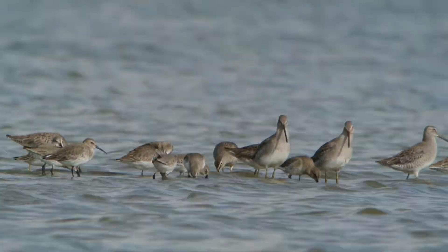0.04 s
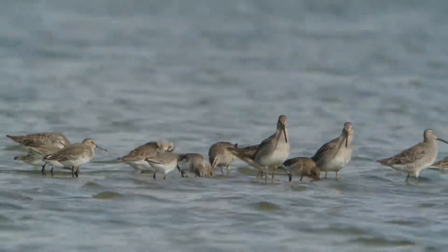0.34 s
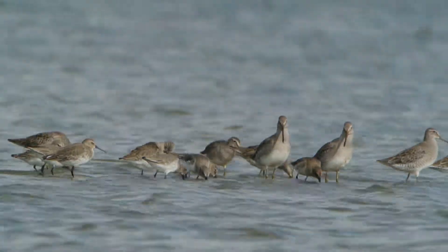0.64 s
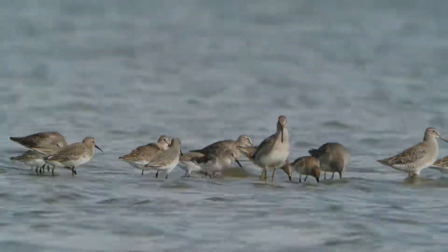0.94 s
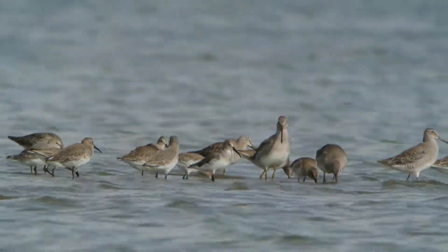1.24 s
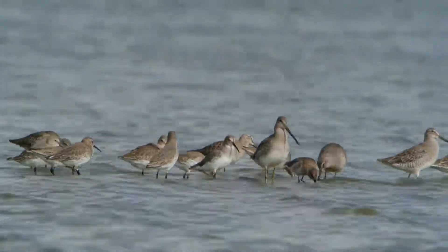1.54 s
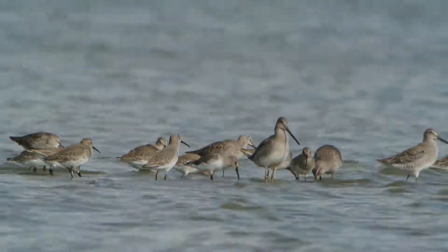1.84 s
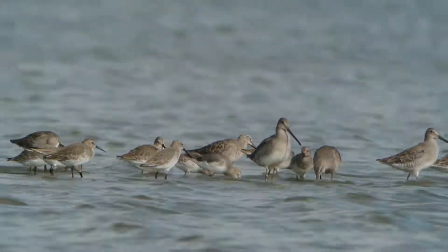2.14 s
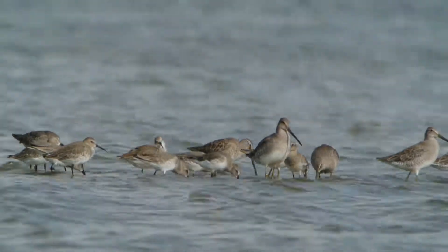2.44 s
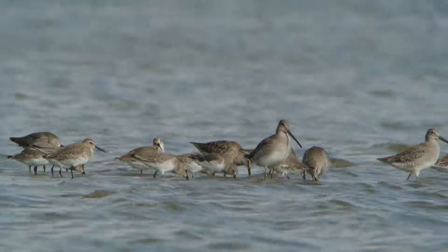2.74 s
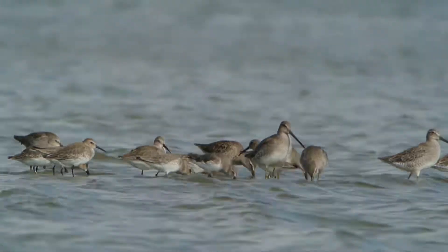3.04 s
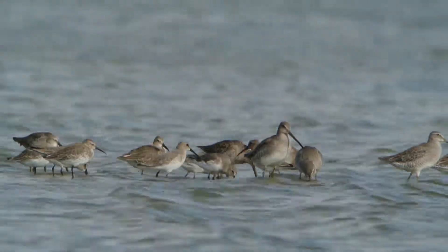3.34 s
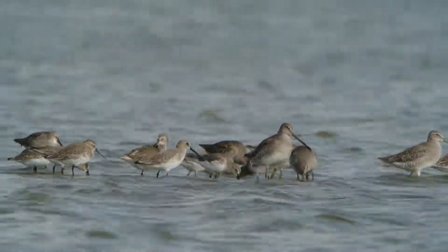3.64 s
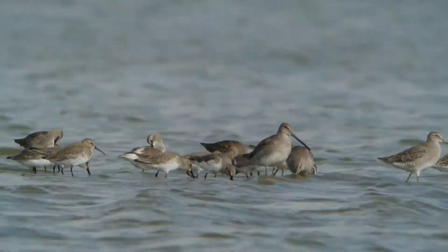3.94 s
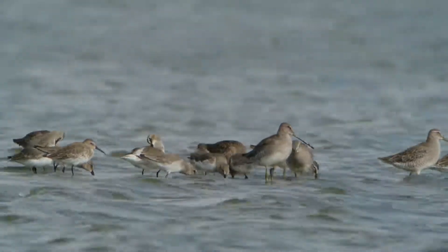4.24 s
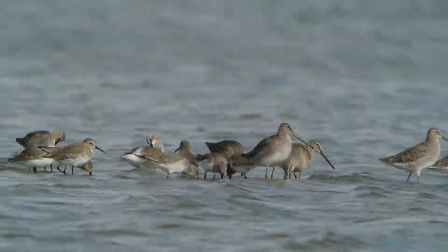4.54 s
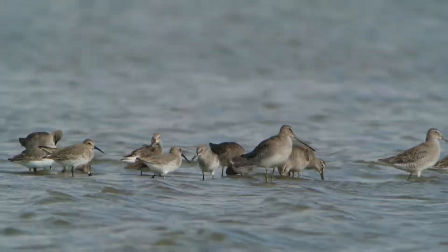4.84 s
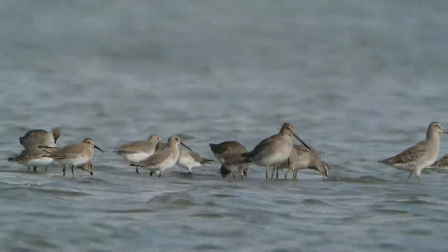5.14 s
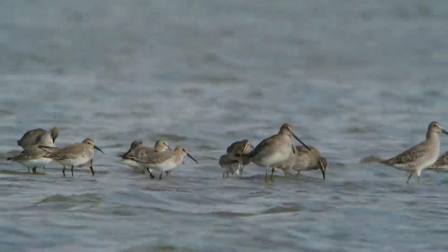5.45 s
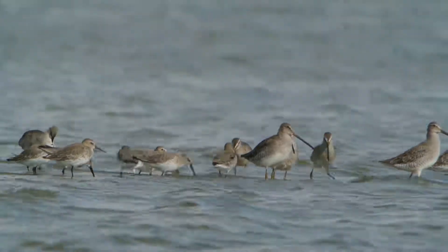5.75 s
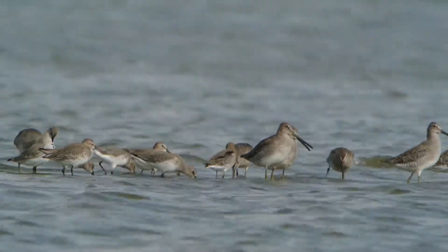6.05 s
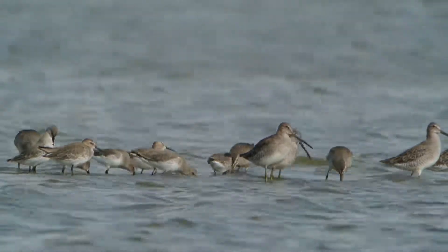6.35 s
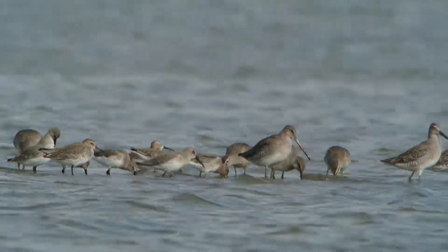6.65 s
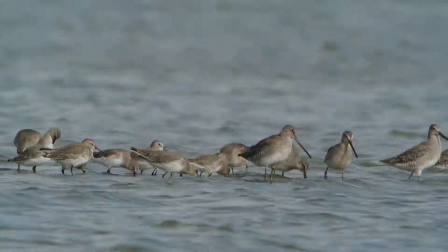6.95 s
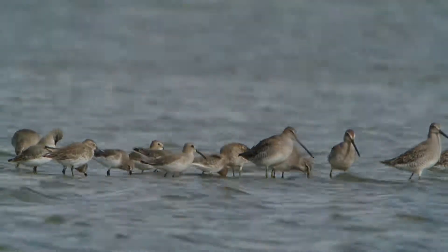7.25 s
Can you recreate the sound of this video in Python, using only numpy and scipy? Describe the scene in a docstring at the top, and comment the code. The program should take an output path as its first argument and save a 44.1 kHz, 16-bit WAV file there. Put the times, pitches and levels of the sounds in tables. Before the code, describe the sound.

Sharp camera shutter clicks fire in pairs and singles over low wind rumble and bumps on the microphone beside water.

```python
"""Beside a windy lagoon, one shot of a reflex camera dies away: like each frame, a run of mirror and
shutter contacts over the whirr of the cocking motor. Wind rumbles on both microphone ports, over far
water and a faint hiss. As it rises, eddies thump on the exposed right port, hardest from 0.5 to 2.1 s.
The camera fires a pair from 1.2 s, a single at 2.6 s, a pair from 4.3 s and a last single at 6.4 s,
and the wind blows on to the end."""
import sys
import numpy as np
from scipy import signal
from scipy.fft import rfft, irfft
from scipy.io import wavfile

SR = 44100
rng = np.random.default_rng(int(sys.argv[2]) if len(sys.argv) > 2 else 0)


def store_wav(level_fs):
    """Save 16-bit WAV to argv[1]."""
    pcm = np.round(np.clip(np.atleast_2d(level_fs), -1, 1) * 32767)
    wavfile.write(sys.argv[1], SR, pcm.T.astype(np.int16))


N = 326340
TIME_S = np.arange(N) / SR
FREQS_HZ = np.maximum(np.fft.rfftfreq(N, 1 / SR), 1)


def from_db(db):
    return 10 ** (np.asarray(db) / 20)


def unit_rms(x):
    return x / np.sqrt(np.mean(x ** 2, axis=-1, keepdims=True) + 1e-20)


def over_time(points):
    return np.interp(TIME_S, *np.transpose(points))


def over_freq(points):
    hz, db = np.transpose(points)
    return np.interp(np.log(FREQS_HZ), np.log(hz), db)


def colour(x, curve_db):
    """Filter that keeps the power of white noise."""
    return irfft(rfft(x) * unit_rms(from_db(curve_db)), N)


def noise_pair(coherence, size=N):
    """White noise at the two ports, partly shared."""
    shared = np.sqrt(coherence) * rng.standard_normal(size)
    return shared + np.sqrt(1 - coherence) * rng.standard_normal((2, size))


def drift(rate_hz):
    """Slow random wander, unit RMS."""
    return unit_rms(irfft(rfft(rng.standard_normal(N)) / (1 + (FREQS_HZ / rate_hz) ** 2), N))


def add(out, start_s, sound):
    """Mix in a sound, dropping any overhang."""
    i = int(start_s * SR)
    first, last = max(i, 0), min(i + sound.shape[-1], out.shape[-1])
    if first < last:
        out[..., first:last] += sound[..., first - i:last - i]


def resonance(x, hz, width_hz):
    """One ringing mode, unity peak gain."""
    return signal.lfilter(*signal.iirpeak(hz, hz / width_hz, fs=SR), x + 1e-18)


def contact_noise(body_db, size, crossover_hz=2600):
    """Dense camera modes: the low body tone reaches both ports alike, the bright crack less so."""
    low, high = (signal.butter(2, crossover_hz, kind, fs=SR, output="sos") for kind in ("low", "high"))
    body = signal.sosfilt(low, noise_pair(coherence=0.9, size=size))
    crack = signal.sosfilt(high, noise_pair(coherence=0.42, size=size))
    return from_db(body_db) * body + crack


# Shots: landing_s, gain_db, landing_gain_db, upper_stop_gain_db, landing_t60_ratio
FRAMES = [(-.0070, -37, 16, 0, 1.05), (1.1521, -26.5, 4, 3, 0.83), (1.35, -26.5, 1, 2.5, 1.2),
          (2.6058, -26, 0.5, 1.5, 0.95), (4.2806, -24.5, -2.5, .5, 1.26), (4.4781, -26, 2, 1.5, 1.1),
          (6.3990, -25, -1, 0, 1.05)]
# Contacts: gain_db, t60_s, body_db, rise_s Rows: an early latch tick, release latch, latch return, aperture
# lever, mirror meets upper stop, hits it as the first curtain opens, second curtain, mirror catch, mirror
# lands, rebounds, settles.
CONTACTS = [(-30, .02, -5, .0005), (-11, 0.015, 10.5, .0003), (-20.5, .022, 14, .0005),
            (-13.5, 0.018, -8, .0008), (-13.5, 0.01, 15.5, 0.00036), (-5.5, 0.021, 9.5, 0.00087),
            (-12, 0.028, 6, .0003), (-14, 0.06, 10, 0.0011), (5.5, .013, -5, 0.00018),
            (-4, 0.023, 4, 0.00034), (-15, 0.028, -11, .0004)]
# Each contact's time before the mirror lands: lead_s
CONTACT_LEADS_S = (.1290, .1169, .1108, .0736, .0554, .0540, .0303, .0080, 0, -.0040, -.0130)
# Contact spectrum: freq_hz, gain_db
CLACK_SPECTRUM = [(300, -9), (800, -6), (1200, -2), (2200, -4.5), (3500, -8), (5000, -2.5), (5700, -4),
                  (6400, -1.5), (7700, -1.5), (9000, -2), (10500, -8.5), (11300, -6.5), (13000, 1),
                  (15500, -4), (17000, -27)]


def shutter(gain_db=5.5, tail_db=-31, tail_t60_s=0.21, shared_power=0.086, upper_stop_lead_s=0.054):
    """Each contact rings the camera in a short noise, partly alike per frame; the landing mirror pings."""
    frames = np.zeros((len(FRAMES), 2, SR // 3))
    t, preroll_s = np.arange(SR // 10) / SR, 0.15
    for lead_s, (contact_db, t60_s, body_db, rise_s) in zip(CONTACT_LEADS_S, CONTACTS):
        shared = np.sqrt(shared_power) * contact_noise(body_db, len(t))
        attack = 1 - np.exp(-t / rise_s)
        tail = from_db(tail_db - 60 * t / tail_t60_s)
        for frame, (_, frame_db, landing_db, stop_db, t60_ratio) in zip(frames, FRAMES):
            own = np.sqrt(1 - shared_power) * contact_noise(body_db, len(t))
            ring_s = t60_s * (t60_ratio if lead_s == 0 else 1)
            envelope = attack * np.hypot(from_db(-60 * t / ring_s), tail)
            click = from_db(gain_db + frame_db + contact_db) * envelope * (shared + own)
            if lead_s == upper_stop_lead_s:
                click *= from_db(stop_db)
            if lead_s == 0:
                mirror_ping = resonance(click, hz=11820, width_hz=550)
                click = from_db(landing_db) * (click + mirror_ping)
            add(frame, preroll_s - lead_s, click)
    out = np.zeros((2, N))
    for (landing_s, *_), frame in zip(FRAMES, frames):
        add(out, landing_s - preroll_s, shell(frame))
    return irfft(rfft(out) * from_db(over_freq(CLACK_SPECTRUM)), N)


# Shell resonances: freq_hz, width_hz, gain_db
SHELL_MODES = [(2084, 80, 2.5), (2630, 91, 6), (3240, 160, 7), (3770, 180, 7.5), (4410, 320, 8),
               (5000, 350, 2.5), (6960, 160, 5.5), (9150, 610, 7.5), (11600, 420, 10), (13150, 700, 0.5),
               (14500, 700, 2.5)]


def shell(clicks, detune=0.006, spread_db=0.5):
    """The shell rings on after the contacts, varying a little per frame and port."""
    out = clicks.copy()
    scatter = np.clip(rng.standard_normal((len(SHELL_MODES), 2, 2)), -1.5, 1.5)
    for (hz, width_hz, gain_db), ports in zip(SHELL_MODES, scatter):
        for port, (dip, shift) in enumerate(ports):
            ring = resonance(clicks[port], hz * (1 + detune * shift), width_hz)
            out[port] += (from_db(gain_db - spread_db * dip) - 1) * ring
    return out


def motor_effort(t, lead_s=0.16, spin_up_s=0.039, tension_lead_s=0.031, tension_end_s=0.0074,
                 tension_db=5, coast_db=2, coast_t60_s=0.15):
    """Spin-up, steady run, push on the mirror spring, coast; the mirror lands at t = 0."""
    spin = np.clip((t + lead_s) / spin_up_s, 0, 1)
    driven_db = tension_db * (t > -tension_lead_s)
    coasting_db = coast_db - 60 * np.maximum(t - tension_end_s, 0) / coast_t60_s
    return spin * from_db(np.where(t < tension_end_s, driven_db, coasting_db))


# Gear whirr: freq_hz, density_db
WHIRR_SPECTRUM = [(400, -40), (1000, 3), (2000, 6.5), (2700, 6.5), (3400, 7), (4150, 11), (4800, 0),
                  (5900, -3), (7500, -1), (8400, -5.5), (9300, 3.5), (10500, 0), (11700, -2), (13700, -3),
                  (15000, -2), (16000, -6)]


def motor(gain_db=-52, ticks_per_s=660, teeth_db=-2, spread_db=7.5):
    """The cocking gears whirr and their teeth rattle through each frame."""
    effort, t = np.zeros(N), np.arange(-SR // 2, SR // 2) / SR
    for landing_s, *_ in FRAMES:
        add(effort, landing_s + t[0], motor_effort(t))
    ticks = (rng.random(N) < ticks_per_s / SR) * rng.choice([-1, 1], N)
    teeth = ticks * from_db(spread_db * rng.uniform(-1, 1, N))
    gears = noise_pair(coherence=0.5) + from_db(teeth_db) * unit_rms(teeth)
    return colour(from_db(gain_db) * effort * gears, over_freq(WHIRR_SPECTRUM))


# Port turbulence: freq_hz, density_db
RUMBLE_SPECTRUM = [(15, -30), (30, -7), (50, -3), (85, 0.5), (150, 0.5), (300, -5), (450, -10), (700, -23),
                   (1100, -31.5), (2500, -50), (6000, -58.5)]


def rumble(level_db, lumps_db, tilt_db_per_oct):
    """Lumpy turbulence at one port."""
    air = rng.standard_normal(N) * from_db(lumps_db * drift(rate_hz=9.7))
    spectrum_db = over_freq(RUMBLE_SPECTRUM) + tilt_db_per_oct * np.log2(FREQS_HZ)
    return from_db(level_db) * unit_rms(colour(air, spectrum_db))


def eddy(t, hz, phase_turns, smoothness):
    """Pressure swing of a passing vortex: quicker if small, duller if smooth."""
    passage, steepness = 2 * np.pi * hz * t / smoothness, smoothness + 1
    swing = np.cos(2 * np.pi * phase_turns + steepness * np.arctan(passage))
    return swing * (1 + passage ** 2) ** (-steepness / 2)


def flutter(strength, centre_hz, spread_db, smoothness, count):
    """Small eddies of mixed size cross a port."""
    out, t = np.zeros(N), np.arange(-300, 300) / SR
    timing = rng.random((count, 2))
    scatter = np.clip(rng.standard_normal((count, 2)), -2, 2)
    for (when, phase_turns), (force, pitch) in zip(timing, scatter):
        pulse = eddy(t, centre_hz * np.exp(0.25 * pitch), phase_turns, smoothness)
        add(out, when * N / SR, from_db(spread_db * force) * pulse)
    return strength * unit_rms(out)


# Wind strength, left port: time_s, level_db
WIND_LEFT = [(0.0, -66), (.3, -61), (0.55, -47.5), (.8, -56), (.92, -58), (1.3, -56), (1.55, -45.5),
             (2.25, -43.5), (2.7, -44.5), (2.85, -41.5), (3.4, -35.5), (3.7, -42), (4.0, -40), (4.9, -44.5),
             (5.4, -43), (5.9, -45), (6.3, -40), (6.85, -40), (7.05, -37), (7.4, -46)]
# Wind strength, right port: time_s, level_db
WIND_RIGHT = [(0.0, -51), (0.2, -68), (.35, -61), (0.45, -43.5), (.7, -55), (.8, -49), (1.05, -49),
              (1.25, -43.5), (1.63, -43), (1.85, -36.5), (2.35, -34), (2.5, -36.5), (2.9, -36),
              (3.05, -40.5), (3.3, -39), (3.8, -41), (4.7, -42), (4.85, -45), (5.1, -37.5), (5.4, -40),
              (6.0, -36.5), (6.4, -33), (6.6, -31.5), (6.72, -40), (7.4, -36.5)]


def wind(left_gain_db=2.5, right_gain_db=1.5, left_flutter_db=-6, right_flutter_db=-10.5):
    """Both ports rumble; the sheltered left gets fewer, duller eddies, the exposed right the buffets."""
    left_db, right_db = over_time(WIND_LEFT), over_time(WIND_RIGHT)
    left = rumble(left_db + left_gain_db, lumps_db=1.5, tilt_db_per_oct=-0.76)
    left_eddies = from_db(left_db + left_flutter_db)
    left += flutter(left_eddies, centre_hz=220, spread_db=7, smoothness=2.8, count=500)
    right = rumble(right_db + right_gain_db, lumps_db=3.5, tilt_db_per_oct=2)
    side_wind_db = 0.42 * np.clip(right_db - left_db, 0, 6)
    right_eddies = from_db(right_db + right_flutter_db + side_wind_db) + stirred_air()
    right += flutter(right_eddies, centre_hz=430, spread_db=8, smoothness=3.75, count=2200)
    return np.array([left, right + buffets()])


# Far wind and water: freq_hz, density_db
SHORE_SPECTRUM = [(20, -7), (90, 8), (170, 3), (220, 3.5), (320, -3), (390, 0), (520, -6.5), (1000, -14),
                  (1250, -11.5), (1650, -13), (2500, -21), (6000, -53), (16000, -52)]


def shore(level_db=-52.5):
    """Steady low wash of far wind and water."""
    return from_db(level_db) * colour(noise_pair(coherence=0.79), over_freq(SHORE_SPECTRUM))


# Hiss colour: freq_hz, density_db
HISS_SPECTRUM = [(100, -6), (1600, 5.5), (2700, 5), (4300, 4.5), (5300, 1.5), (8000, 1.3), (9400, 4.5),
                 (10200, 2), (11200, 3), (12500, 4), (14200, 6), (15650, 1.5), (15950, -4)]
# Hiss swell: time_s, level_db
HISS_LEVEL = [(0, -56), (.25, -54.5), (.42, -55), (.7, -55), (1.7, -54), (1.95, -53), (2.2, -54),
              (2.7, -52.5), (2.95, -53), (3.2, -53), (3.32, -54), (4.2, -54), (4.8, -55), (5.27, -54.5),
              (5.42, -54), (5.72, -55.5), (6.0, -54), (6.7, -54), (7.1, -54.5), (7.4, -58.5)]


def hiss(waver_db=1.0):
    """A soft, wide hiss swells, sinks and wavers."""
    level_db = over_time(HISS_LEVEL) + waver_db * drift(rate_hz=12)
    return from_db(level_db) * colour(noise_pair(coherence=0.01), over_freq(HISS_SPECTRUM))


# Right-port buffets: middle_s, length_s, level_db, nominal_hz, smoothness, crackle_db
BUFFETS = [(0.081, 0.018, -36, 230, 6.1, -19), (.094, 0.0033, -30.5, 455, 3, -9),
           (0.415, 0.008, -38.5, 376, 4.1, -16), (0.5463, 0.0045, -19, 520, 2.5, -10),
           (0.5568, 0.01, -21, 625, 3.6, -6), (.5629, 0.0027, -17.5, 570, 2.6, -8),
           (0.592, 0.006, -29, 230, 3.7, -13), (0.6051, .0028, -17, 584, 2, -16),
           (0.6104, .003, -18.5, 580, 1.8, -19), (.6165, 0.0069, -20.5, 496, 2.8, -6),
           (.668, .0057, -36.5, 230, 4.3, -13), (.695, 0.008, -41, 445, 4.1, -9),
           (0.8255, 0.0064, -11, 500, 6, -8), (0.8307, 0.003, -8, 660, 5, -12),
           (.8362, 0.0083, -18.5, 710, 3.5, -6), (1.185, 0.027, -35.5, 186, 1.6, -13),
           (1.366, 0.014, -24, 498, 2.7, -9), (1.3913, 0.0068, -11.5, 492, 3.8, -6),
           (1.3977, 0.0039, -11, 536, 3.2, -8), (1.4831, 0.0046, -18.5, 403, 2.2, -5),
           (1.4885, 0.012, -15, 568, 2.4, -10), (1.5955, 0.0071, -13, 604, 4.3, -8.5),
           (1.68, 0.0018, -23, 575, 2.8, -13), (1.703, 0.021, -34.5, 254, 1.1, -13),
           (1.8873, 0.0051, -21, 710, 2.2, -9), (2.047, 0.0087, -30.5, 450, 1.6, -6),
           (2.0992, 0.0025, -7.5, 766, 4.1, -11), (2.107, 0.009, -18, 840, 2.2, -8),
           (2.2669, 0.0024, -20.5, 500, 1.44, -5), (2.9507, .002, -22, 760, 3.3, -13),
           (2.9549, 0.002, -17, 980, 3.6, -12), (3.513, 0.0062, -28, 550, 2.4, -9),
           (3.891, 0.0061, -26.5, 467, 2.7, -13), (3.962, 0.0028, -21.5, 413, 3, -19),
           (3.9667, 0.0026, -19, 563, 3.1, -11), (3.9862, 0.002, -24, 650, 2.3, -14),
           (4.528, 0.0068, -19, 383, 4, -9), (4.537, .0022, -25.5, 450, 2.2, -6),
           (4.5663, .002, -24.5, 520, 2.2, -13), (4.571, 0.0033, -26.5, 624, 1.6, -10),
           (4.631, .0021, -29, 480, 3, -16), (4.6959, 0.0069, -25, 367, 1.9, -17),
           (4.7031, 0.0051, -25.5, 480, 1.6, -18), (4.762, .0066, -30, 600, 2.8, -13),
           (4.934, 0.0033, -35, 380, 3, -11), (5.048, 0.016, -27, 185, 8.6, -9),
           (5.082, 0.047, -38, 407, 2.2, -15), (5.103, 0.0087, -27, 290, 7.5, -8),
           (5.116, .0014, -19.5, 560, 2.6, -13), (5.1359, 0.0014, -23.5, 590, 1.7, -20),
           (5.464, 0.0054, -25, 298, 2, -6), (5.483, .024, -31, 554, 1.9, -18),
           (5.5297, 0.0026, -22.5, 423, 2.8, -13), (5.5352, 0.0038, -12, 704, 4.8, -5),
           (5.543, 0.0021, -22, 770, 3.6, -10), (5.711, 0.01, -20, 220, 6.9, -7),
           (5.724, 0.0097, -23, 242, 0.7, -13), (5.7337, 0.0025, -23, 600, 1.7, -3),
           (5.743, 0.0077, -22.5, 677, 2.25, -13), (5.8855, 0.0054, -22.5, 746, 2.1, -11),
           (5.893, .002, -29, 493, 4.1, -16), (7.3139, .002, -33, 580, 1.7, -6)]
# Port response: freq_hz, gain_db
PORT_RESPONSE = [(50, -1), (120, 0), (250, -0.5), (1500, -1.5), (2500, -2), (4000, -7)]


def buffets(gain_db=0.18, spread_db=4, pitch_ratio=0.9, pitch_spread=0.16, crackle_ratio=1.59,
            spacing_cycles=1.3, jitter=0.3, half_window_s=0.03):
    """A chain of strong eddies swells and fades; each sheds a smaller, quicker one."""
    out, t = np.zeros(N), np.arange(-half_window_s, half_window_s, 1 / SR)
    for middle_s, length_s, level_db, nominal_hz, smoothness, crackle_db in BUFFETS:
        chain = np.zeros(len(t))
        for k, (force, late, turn, pitch, shed) in enumerate(rng.uniform(-1, 1, (15, 5)), -7):
            outer = k != 0
            offset_s = (k + jitter * late * outer) * spacing_cycles / nominal_hz
            swell = from_db(spread_db * force * outer) / (1 + abs(2 * offset_s / length_s) ** 6)
            eddy_hz = nominal_hz * pitch_ratio * np.exp(pitch_spread * pitch)
            phase_turns = turn * (0.5 if outer else 0.26)  # the middle eddy hits more squarely
            thump = eddy(t - offset_s, eddy_hz, phase_turns, smoothness)
            wake_s = offset_s + (1 + shed) / (2 * nominal_hz)
            wake = from_db(crackle_db) * eddy(t - wake_s, eddy_hz * crackle_ratio, shed, smoothness)
            chain += swell * (thump + wake)
        strength = from_db(level_db + gain_db) * np.sqrt(length_s * SR / len(t))
        add(out, middle_s - half_window_s, strength * unit_rms(chain))
    return irfft(rfft(out) * from_db(over_freq(PORT_RESPONSE)), N)


def stirred_air(gain_db=-18, reach_s=0.012, lag_s=0.0031):
    """Strength of the small eddies that lead and trail each buffet."""
    return sum(from_db(level_db + gain_db) / (1 + ((TIME_S - middle_s - lag_s) / reach_s) ** 2) ** 2
               for middle_s, _, level_db, *_ in BUFFETS)


def scene(pan_db=0.7):
    """The camera, slightly left, in the wind by the water."""
    camera = (shutter() + motor()) * from_db([[pan_db], [-pan_db]])
    return camera + wind() + shore() + hiss()


def record(dry):
    """Steep top cut."""
    cutoff_hz = 16050
    return signal.sosfilt(signal.ellip(10, 0.1, 70, cutoff_hz, fs=SR, output="sos"), dry)


dry = scene()
out = record(dry)
store_wav(out)
```